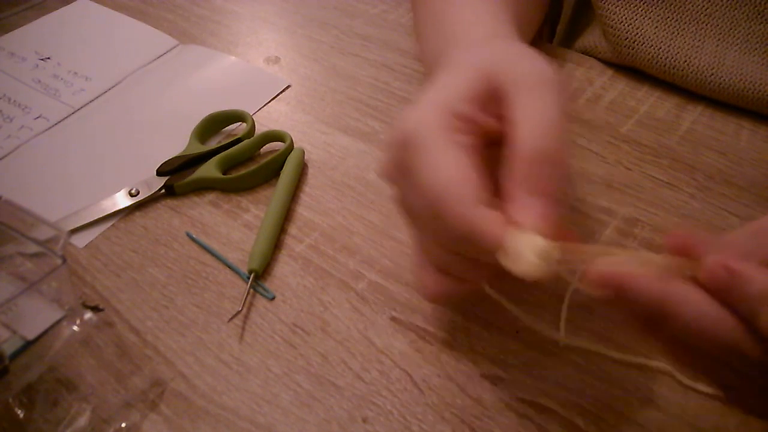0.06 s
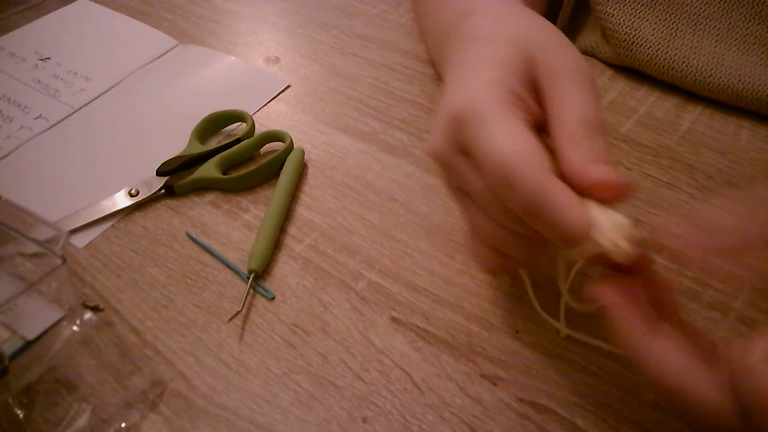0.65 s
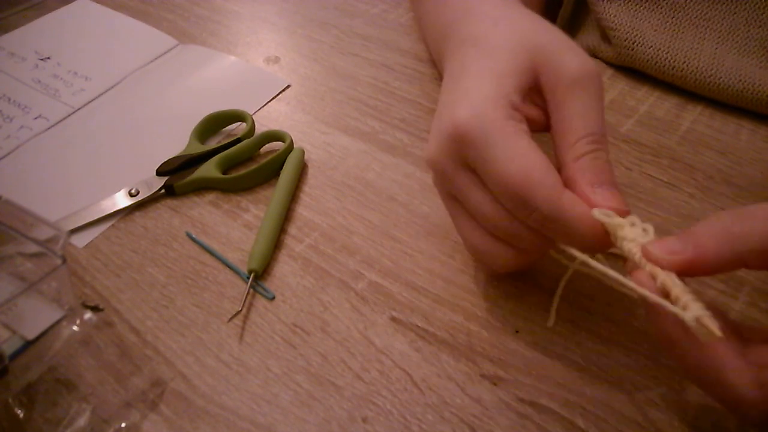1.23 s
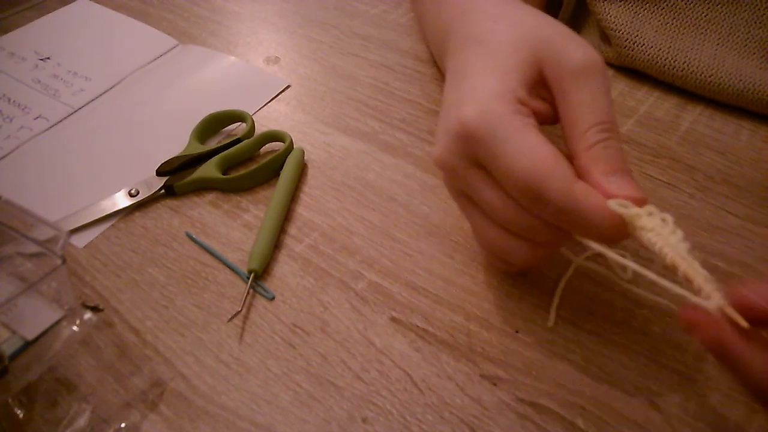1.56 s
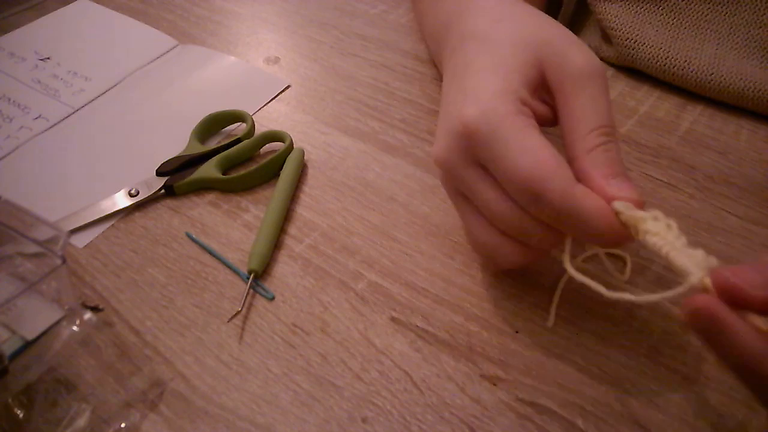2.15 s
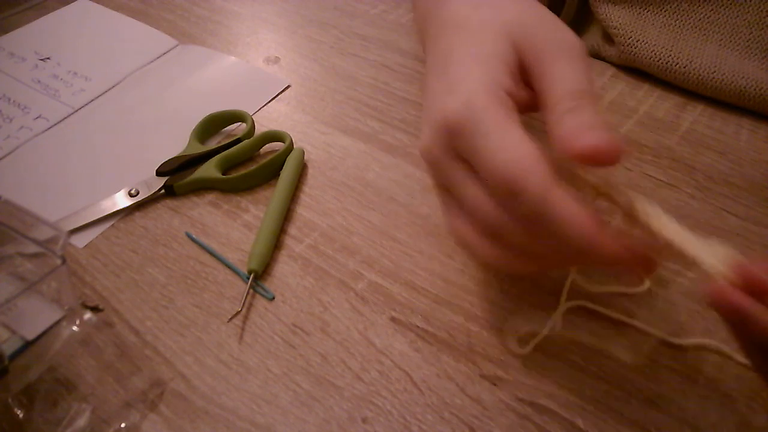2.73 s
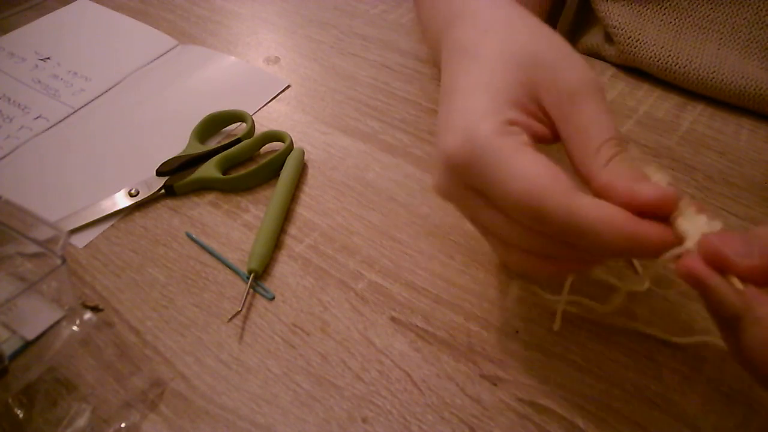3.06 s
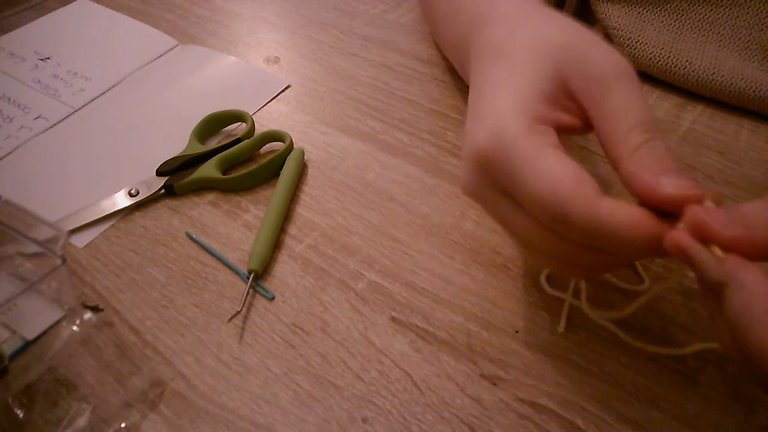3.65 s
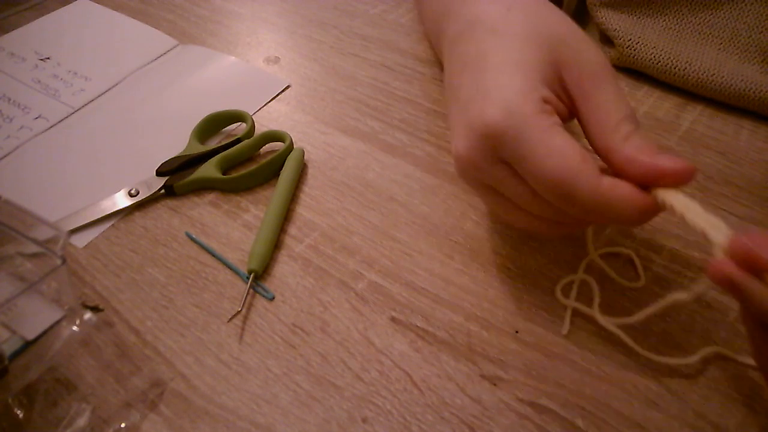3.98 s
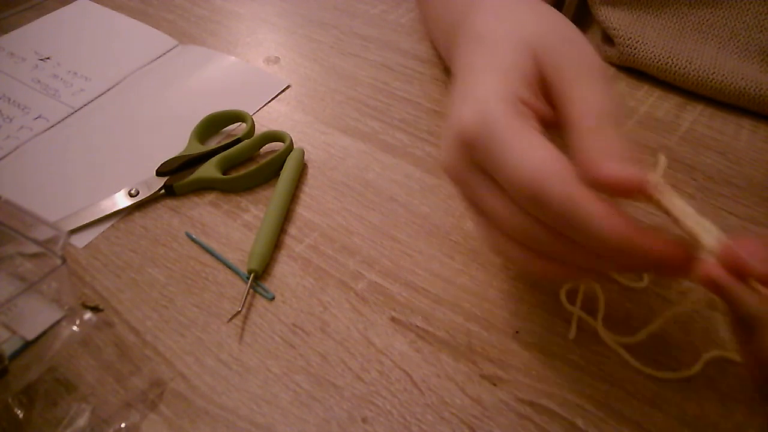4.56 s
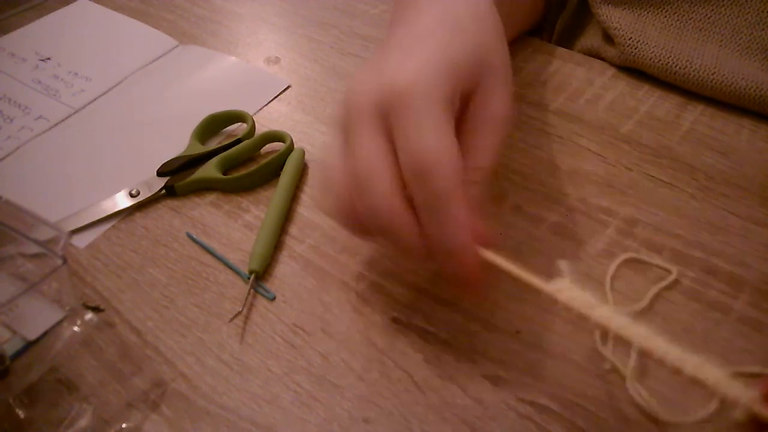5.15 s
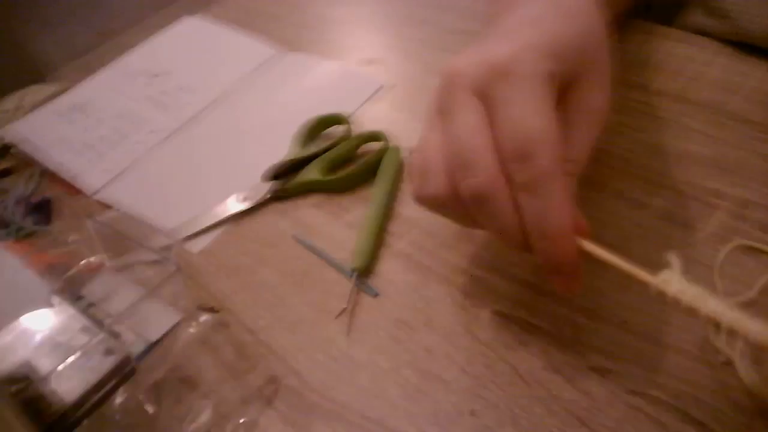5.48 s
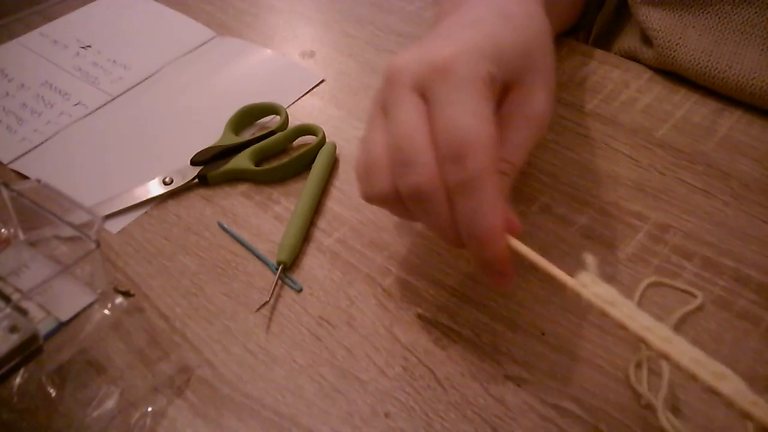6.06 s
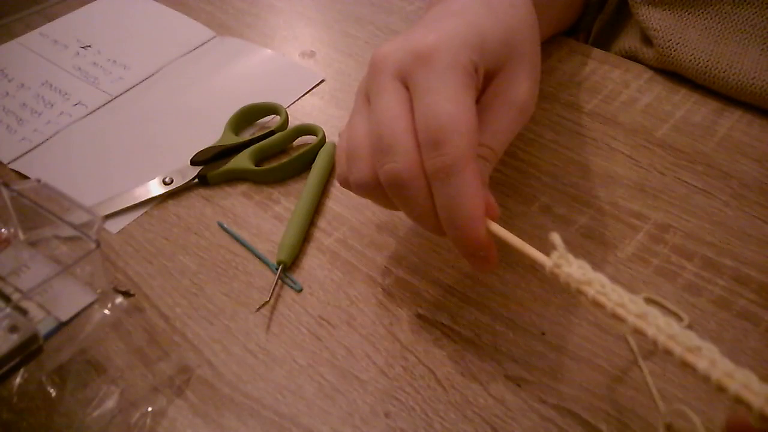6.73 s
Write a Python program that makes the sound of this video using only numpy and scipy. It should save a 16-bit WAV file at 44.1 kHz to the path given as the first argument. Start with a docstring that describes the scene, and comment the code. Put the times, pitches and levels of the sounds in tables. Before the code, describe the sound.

Yarn rasps and squeaks softly on a wooden knitting needle, with scattered clicks and knocks against a table in a quiet room.

```python
"""A quiet room: low rumble, faint hum, hiss and a thin, pulsing electronic whine. Almost at once, close
by, hands work yarn along a wooden knitting needle just above a table. Stitches rasp as their fibres
catch on the wood, and the tight ones squeak. The needle knocks the table top now and then, and clicks
as it snaps out of a stitch. Late on, hiss, hum and whine sink for about a second and jump back."""
import sys
import numpy as np
from scipy import signal
from scipy.fft import rfft, irfft, next_fast_len
from scipy.io import wavfile

SR = 44100
rng = np.random.default_rng(int(sys.argv[2]) if len(sys.argv) > 2 else 0)


def dump(signal):
    """Clip the signal to [-1, 1] and save it as 16-bit WAV at the path in sys.argv[1]."""
    limited = np.clip(np.atleast_2d(signal).T, -1, 1)
    pcm = np.round(limited * 32767).astype(np.int16)
    wavfile.write(sys.argv[1], SR, pcm)


N = 301644
TIME = np.arange(N) / SR

# Modes of the table top. Each row: frequency in Hz, relative level in dB, time to fall 60 dB in seconds.
TABLE_MODES = [(151.4, -19, 0.097), (250.5, -17, 0.13), (335, -16.5, 0.145), (463.7, -7, 0.053),
               (541, -12, 0.066), (602, -7, 0.037), (730, -2.5, 0.03), (787.5, -8.5, 0.034),
               (930, -3.5, 0.034), (1251, -17, 0.052), (1550, -16, 0.016)]
# The needle snaps out of a stitch. Each row: time in seconds, needle gain in dB, its tilt in dB/octave,
# place along the needle (0-0.5), hardness as a corner in Hz, longest skid in seconds, table gain in dB,
# its tilt in dB/octave, thud gain in dB, gain of the yarn running on in dB, its fade time in seconds.
STITCH_SNAPS = [(0.7463, -10.5, 0, 0.0061, 9900, 0.00016, -28.5, -6, -25, -48.5, .004),
                (1.969, -28.5, 7, 0.118, 8600, 0.00056, -29, 7.5, -31.5, -51.5, 0.05),
                (3.0784, -27.5, 3.5, .1, 8400, 0.00042, -27.5, -0.5, -32.5, -59, .075),
                (5.062, -32.5, 2.5, 0.021, 4430, 0.00068, -42, 7, -33.5, -67, 0.034),
                (6.2305, -17, -1, .17, 6200, 0.0005, -33.5, -3, -24, -64.5, 0.034)]


def amp(db):
    """Decibels to gain."""
    return 10 ** (np.asarray(db) / 20)


def unit_rms(x):
    """Scales to rms 1."""
    return x / np.sqrt(np.mean(x ** 2) + 1e-20)


def coloured(x, spectrum):
    """Equalises along a curve of (Hz, dB) points."""
    hz, db = np.transpose(spectrum)
    size = next_fast_len(len(x))
    bins = np.fft.rfftfreq(size, 1 / SR)
    gain = amp(np.interp(np.log(bins + 1), np.log(hz), db))
    return irfft(rfft(x, size) * gain, size)[:len(x)]


def narrow_noise(hz, width_hz, size=N):
    """Noise in one steep resonance: a wavering tone of rms 1."""
    pole = np.exp((2j * np.pi * hz - np.pi * width_hz) / SR)
    return unit_rms(signal.lfilter([1], np.poly([pole, pole]), rng.standard_normal(size)).real)


def add(mix, s, sound):
    """Mixes a sound in at s seconds."""
    part = mix[round(s * SR):][:len(sound)]
    part += sound[:len(part)]


def decay(t, t60):
    """An envelope that falls 60 dB in t60 seconds."""
    return np.exp(-np.log(1000) * t / t60)


def rumble(trim_db=-1.5):
    """Deep noise that swells and ebbs unevenly."""
    # Each row: frequency in Hz, relative level in dB.
    spectrum = [(12, -19.5), (25, -13), (35, 2), (50, -1.5), (65, -12.5), (120, -19.5), (250, -28.5),
                (600, -58.5)]
    # Each row: time in seconds, level before the trim in dB.
    swells = [(0.1, -53), (2.17, -56.5), (3.44, -48.5), (4.88, -63.5), (5.34, -46.5), (6.35, -57),
              (6.65, -50), (6.8, -55)]
    level_db = np.interp(TIME, *np.transpose(swells)) + trim_db
    return amp(level_db) * unit_rms(coloured(rng.standard_normal(N), spectrum))


def hiss(level_db=-56):
    """A soft bed of noise, weighted to the bass."""
    # Each row: frequency in Hz, relative level in dB.
    spectrum = [(20, -10), (60, 4), (150, -1), (280, -2), (420, -7), (700, -10.5), (1000, -12),
                (1400, -16.5), (2200, -21), (4000, -25), (7200, -27.5), (10000, -30), (13000, -32),
                (17000, -33)]
    return amp(level_db) * unit_rms(coloured(rng.standard_normal(N), spectrum))


def hum():
    """Faint tones, each wavering on its own."""
    # Each row: frequency in Hz, level in dB.
    tones = [(146, -66), (199, -64.5), (243, -63.5), (301, -66), (500, -79.5), (797, -76.5), (1077, -73.5),
             (1105, -76), (5534, -89.5)]
    return sum(amp(db) * narrow_noise(hz, width_hz=hz * 0.028) for hz, db in tones)


def whine(hz=8280, pulse_hz=12.49, tone_db=-75.5, octave_db=-78, fuzz_db=-74, floor=0.24):
    """A thin electronic tone with its octave and a fuzzy skirt, switching up in regular pulses."""
    gate = np.clip(2 * (np.cos(2 * np.pi * pulse_hz * TIME) - .25), 0, 1)
    pulses = floor + (1 - floor) * gate
    phase = 2 * np.pi * hz * TIME
    fuzz = amp(fuzz_db) * narrow_noise(hz=8190, width_hz=310)
    return pulses * (amp(tone_db) * np.sin(phase) + amp(octave_db) * np.sin(2 * phase) + fuzz)


def background(sink_at_s=4.11, sink_db_per_s=12, return_at_s=5.055, return_s=0.028):
    """Hiss, hum and whine sink slowly and jump back together, while the rumble carries on."""
    bed = hiss() + hum()
    low_end = rumble()
    sunk_db = sink_db_per_s * np.maximum(TIME - sink_at_s, 0)
    sunk_db *= np.clip(1 - (TIME - return_at_s) / return_s, 0, 1)
    return amp(-sunk_db) * (bed + whine()) + low_end


def fibres(spectrum, per_s, spread_db):
    """Friction grain: countless fibres catch and let go, a few much harder than the rest."""
    strength = amp(spread_db * np.minimum(rng.exponential(1, N), 4))
    catches = rng.standard_normal(N) * strength * (rng.random(N) < per_s / SR)
    return unit_rms(coloured(catches, spectrum))


def stroke(start, length, top):
    """The samples of one stroke and its strength: an arch whose top lies at a share of its length."""
    span = slice(*np.searchsorted(TIME, [start, start + length]))
    progress = np.interp(TIME[span] - start, [0, length * top, length], [0, .5, 1])
    return span, np.sin(np.pi * progress)


def sliding_yarn(run_up_s=.038, run_rub_db=2):
    """Sliding stitches rasp on the wood and rub dully on the fingers; the yarn runs on after each snap."""
    # Colours of coarse rasp, fine rasp and dull rub. Each row: frequency in Hz, relative level in dB.
    coarse_spectrum = [(500, -20.5), (900, -0.5), (1500, 0.5), (1850, 2.5), (2200, 1.5), (2600, -7),
                       (3200, 2.5), (3650, 1.5), (4200, -4), (5600, -4.5), (6400, -10.5), (7000, -7),
                       (8200, -12.5), (11000, -30.5)]
    fine_spectrum = [(2000, -31), (2700, -14), (3200, -6), (3700, -3.5), (4200, -10.5), (5600, -5),
                     (6300, -6), (6950, 1.5), (7500, -7.5), (8100, -7.5), (8900, -17), (11500, -25.5),
                     (12800, -25), (14000, -39.5)]
    rub_spectrum = [(100, -18.5), (350, -7.5), (560, -1), (800, -3), (1100, -11), (1500, -15), (2300, -23),
                    (4000, -43)]
    # Each row: start in seconds, length in seconds, rasp in dB, share of fine rasp (0-1), rub in dB.
    slides = [(0.144, .022, -50, .2, -60.5), (0.159, .13, -60.5, .6, -65), (1.028, 0.081, -61.5, 0.9, -52),
              (1.182, 0.036, -68, 1, -58), (4.397, 0.097, -69.5, 0.85, -55), (5.097, 0.19, -53, 0.99, -66),
              (5.308, 0.056, -55.5, 0.6, -76), (5.418, 0.15, -58.5, 0.93, -66),
              (5.556, 0.048, -61, 0.5, -59), (5.736, 0.1, -58.5, .25, -57), (5.832, 0.057, -63, .3, -71),
              (6.262, 0.043, -55.5, 0.3, -71), (6.344, 0.073, -59.5, 0.46, -65)]
    coarse = fibres(coarse_spectrum, per_s=3600, spread_db=3.5)
    fine = fibres(fine_spectrum, per_s=4500, spread_db=3)
    rub = fibres(rub_spectrum, per_s=2100, spread_db=2.5)

    def rasp(fineness):
        """An equal-power blend of fine and coarse rasp."""
        return np.sqrt(fineness) * fine + np.sqrt(1 - fineness) * coarse

    out = np.zeros(N)
    for start, length, rasp_db, fineness, rub_db in slides:
        span, strength = stroke(start, length, top=0.4)
        out[span] += strength * (amp(rasp_db) * rasp(fineness)[span] + amp(rub_db) * rub[span])
    running = rasp(fineness=.5) + amp(run_rub_db) * rub
    for s, *_, run_db, fade_s in STITCH_SNAPS:
        speed = np.interp(TIME - s, [0, run_up_s], [.3, 1], left=0)
        fade = np.exp(-np.maximum(TIME - s - run_up_s, 0) / fade_s)
        out += amp(run_db) * speed * fade * running
    return out


def struck_wood(modes, tilt_db, place, corner_hz, pivot_hz):
    """Modes die away after a blow; those with a node at the place of contact stay weak."""
    hz, db, t60 = np.transpose(modes)[:, :, None]
    order = np.arange(1, len(modes) + 1)[:, None]
    t = np.arange(round(t60.max() * SR)) / SR
    coupling = (-1.) ** order * (.25 + .75 * np.cos(np.pi * order * place) ** 2)
    softness = np.hypot(1, (hz / corner_hz) ** 3)  # a soft contact excites little treble
    gain = coupling * amp(db + tilt_db * np.log2(hz / pivot_hz)) / softness
    attack = 1 - np.exp(-t / .00007)  # wood gives a little, so no blow starts at once
    return attack * np.sum(gain * decay(t, t60) * np.sin(2 * np.pi * hz * t), axis=0)


def needle_click(tilt_db, place, corner_hz, skid_s, rebound=0.44):
    """The needle rings briefly; a skid smears the blow into tiny rebounds without changing its colour."""
    # Each row: frequency in Hz, relative level in dB, time to fall 60 dB in seconds.
    needle_modes = [(810, -12, 0.017), (1146, -5, 0.014), (1630, -5, 0.007), (2115, -7.5, 0.024),
                    (2690, -6, 0.0082), (3123, -7.5, 0.015), (3584, -1.5, 0.016), (4580, -7, 0.0095),
                    (5500, -3, 0.011), (5970, -5.5, 0.0099), (6936, -1.5, 0.012), (8000, -10, 0.0076),
                    (8440, -8, 0.011), (9860, -20, 0.012), (12500, -19.5, 0.015)]
    click = struck_wood(needle_modes, tilt_db, place, corner_hz, pivot_hz=3500)
    for delay_s in skid_s * rng.random(4):
        gap = np.zeros(round(delay_s * SR))
        click = signal.lfilter(np.r_[rebound, gap, 1], np.r_[1, gap, rebound], click)  # all-pass
    return click


def table_ring(tilt_db, place, corner_hz, echo_s=.0107, echo_db=-13):
    """The table top rings, and a nearby surface returns the sound."""
    direct = struck_wood(TABLE_MODES, tilt_db, place, corner_hz, pivot_hz=600)
    gap = np.zeros(round(echo_s * SR))
    return np.r_[direct, gap] + amp(echo_db) * np.r_[gap, direct]


def knocks(needle_tilt_db=6.5, metal_hz=6020, metal_db=-51):
    """Each knock rings table top and needle; the strongest also sets a metal tool lying there ringing."""
    # Each row: time in seconds, table gain in dB, its tilt in dB/octave, needle gain in dB,
    # place of contact (0-0.5), hardness as a corner in Hz.
    blows = [(0.1455, -33.5, -4, -31, .335, 5900), (0.2194, -5, -1, -17.5, 0.24, 18000),
             (0.7812, -47, -10.5, -38, 0.063, 7500), (1.0380, -35.5, -7, -37, 0.37, 3500),
             (1.1065, -23, -1.5, -31.5, 0.16, 7400), (1.1229, -30.5, -5.5, -50, .2, 5500),
             (2.169, -45, 5.5, -44.5, 0.238, 5900), (4.4145, -35, -7.5, -44.5, .18, 3616),
             (5.4825, -34, -6, -47, 0.15, 5000), (5.5181, -22, -3, -31.5, .16, 4360),
             (5.5812, -37, -8, -44, 0.14, 3400), (5.604, -40.5, -14, -55, .31, 6000),
             (5.681, -40.5, 9, -32, 0.19, 2580), (5.789, -43.5, -2, -50, .12, 4500)]
    out = np.zeros(N)
    for s, table_db, tilt_db, needle_db, place, corner_hz in blows:
        add(out, s, amp(needle_db) * needle_click(needle_tilt_db, place, corner_hz, skid_s=0.00041))
        add(out, s, amp(table_db) * table_ring(tilt_db, place, corner_hz))
    t = np.arange(SR // 2) / SR
    metal = decay(t, t60=0.16) * np.sin(2 * np.pi * metal_hz * t)
    strongest_at_s = max(blows, key=lambda row: row[1])[0]
    add(out, strongest_at_s, amp(metal_db) * metal)
    return out


def snaps(table_place=0.362, thud_lag_s=.0058):
    """Leaving a stitch, the needle clicks and jolts the table; the hand lands after it with a soft thud."""
    out = np.zeros(N)
    thud = struck_wood(TABLE_MODES, tilt_db=-7, place=.33, corner_hz=300, pivot_hz=600)
    for row in STITCH_SNAPS:
        s, needle_db, tilt_db, place, corner_hz, skid_s, table_db, table_tilt_db, thud_db = row[:9]
        add(out, s, amp(needle_db) * needle_click(tilt_db, place, corner_hz, skid_s))
        add(out, s, amp(table_db) * table_ring(table_tilt_db, table_place, corner_hz))
        add(out, s + thud_lag_s, amp(thud_db) * thud)
    return out


def squeaks():
    """Tight stitches squeak on the needle, each a short, high, wavering tone."""
    # Each row: start in seconds, length in seconds, pitch in Hz, level in dB.
    tight_stitches = [(1.035, 0.027, 3310, -51), (1.074, 0.019, 6800, -56), (4.411, 0.018, 3310, -51),
                      (4.434, 0.062, 3290, -61), (5.319, .028, 5750, -56.5), (5.558, 0.036, 3800, -57),
                      (5.744, .035, 5550, -66)]
    out = np.zeros(N)
    for start, length, hz, db in tight_stitches:
        span, strength = stroke(start, length, top=0.17)
        out[span] += amp(db) * strength ** 2 * narrow_noise(hz, width_hz=240, size=len(strength))
    return out


def hollow_notch(x, hz=4150, width_hz=450):
    """A narrow dip near 4 kHz makes needle and yarn sound slightly hollow."""
    return signal.lfilter(*signal.iirnotch(hz, hz / width_hz, fs=SR), x)


def room(x, t60=0.3, onset_s=0.0021):
    """A diffuse tail from a furnished room that swallows the treble."""
    # Each row: frequency in Hz, gain of the tail in dB.
    spectrum = [(100, -12), (300, -13.5), (900, -15.5), (1500, -31.5), (3000, -30.5), (7000, -33.5),
                (14000, -35)]
    t = np.arange(SR // 2) / SR
    fade_in = np.clip(t / onset_s - .5, 0, 1)
    tail = rng.standard_normal(len(t)) * decay(t, t60) * fade_in
    reverb = signal.fftconvolve(x, tail / np.linalg.norm(tail))[:N]
    return coloured(reverb, spectrum)


def scene():
    """Needle and yarn close by, the room behind them, in mono."""
    hands = hollow_notch(snaps() + knocks() + sliding_yarn() + squeaks())
    return (hands + room(hands) + background())[None]


def record(dry, cutoff_hz=17200):
    """A steep low-pass trims the very top of the treble."""
    low_pass = signal.firwin(511, cutoff_hz, window=("kaiser", 7), fs=SR)
    return signal.oaconvolve(dry, low_pass[None], "same")


dry = scene()
out = record(dry)
dump(out)
```